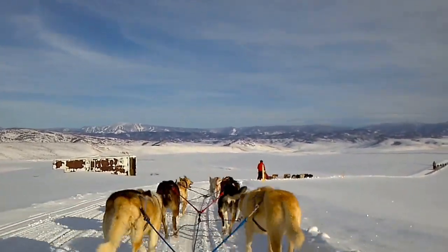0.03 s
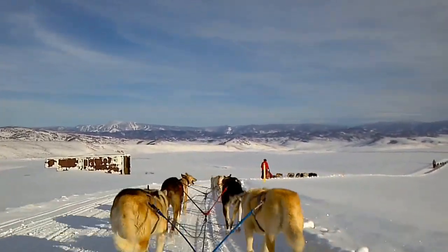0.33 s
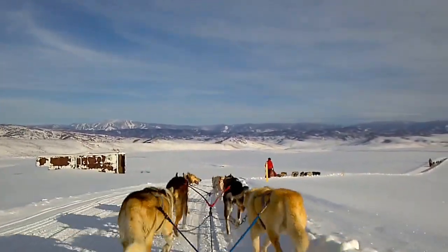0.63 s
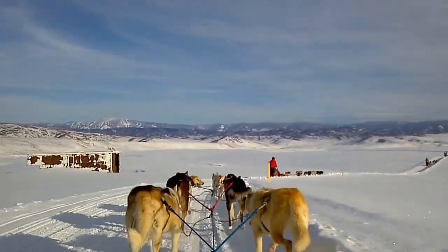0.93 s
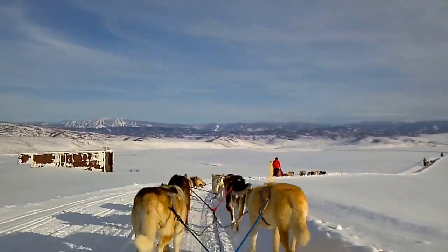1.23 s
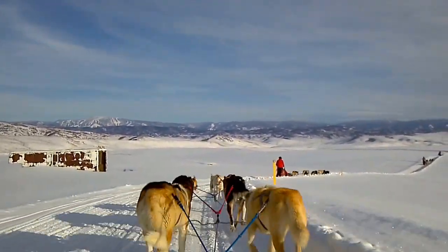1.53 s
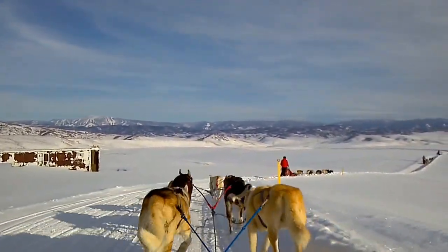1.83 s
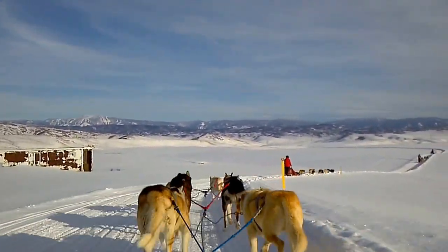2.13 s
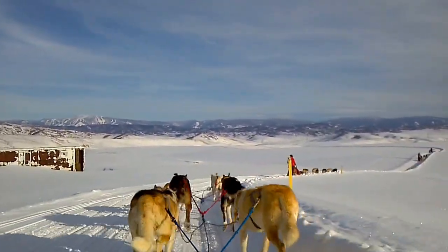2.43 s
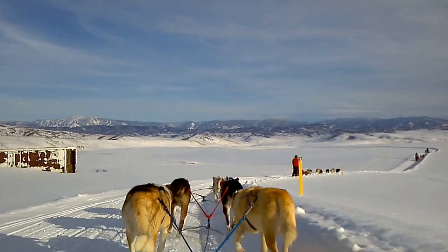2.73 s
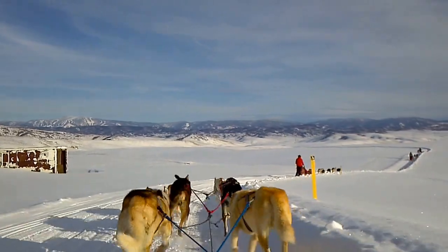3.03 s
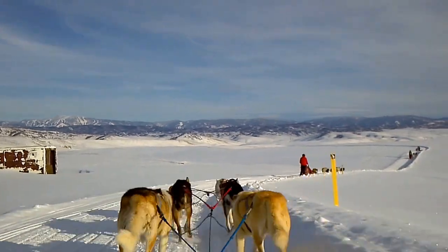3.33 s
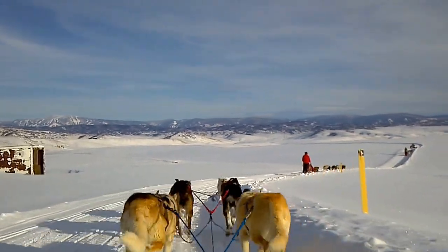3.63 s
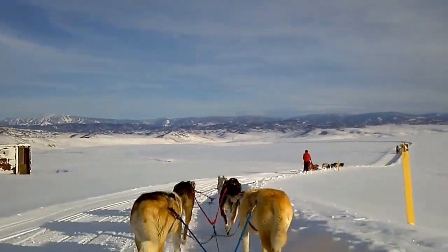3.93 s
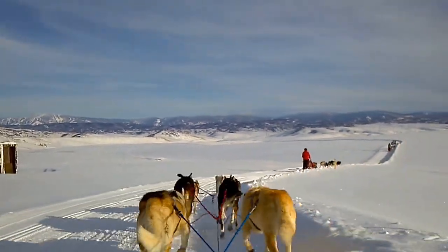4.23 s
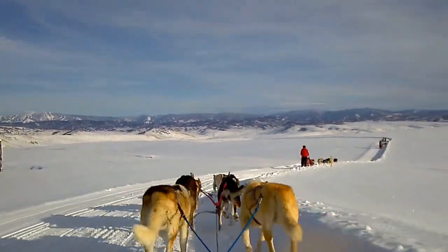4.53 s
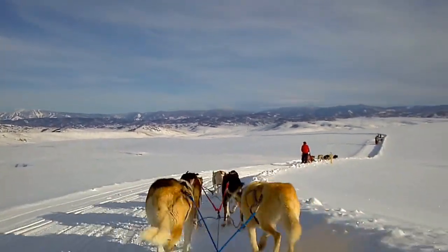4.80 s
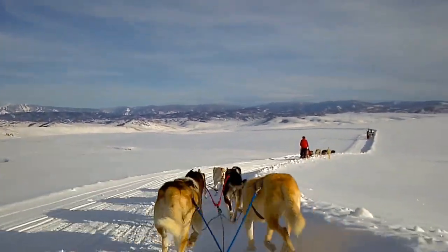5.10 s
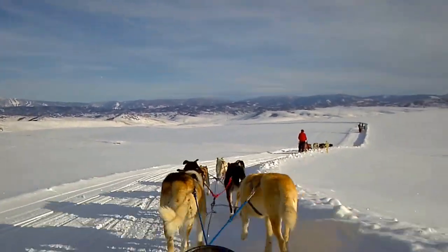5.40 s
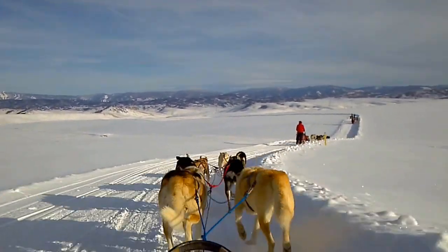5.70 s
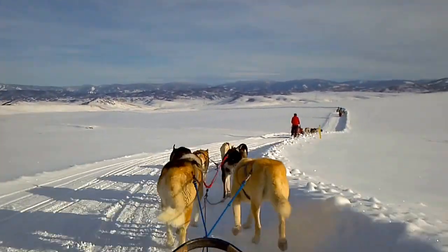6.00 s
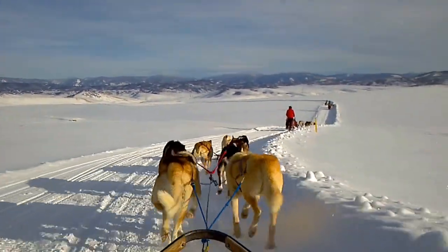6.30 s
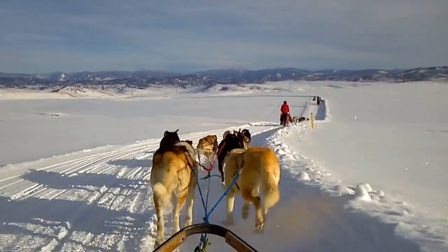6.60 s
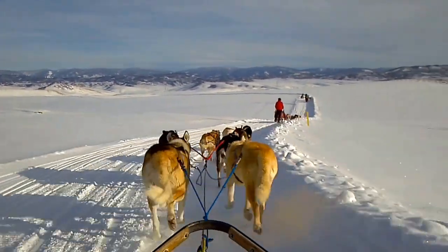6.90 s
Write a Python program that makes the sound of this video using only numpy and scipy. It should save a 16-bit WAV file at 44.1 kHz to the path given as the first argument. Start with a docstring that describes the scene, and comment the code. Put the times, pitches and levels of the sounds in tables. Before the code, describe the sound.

A dog sled slides over packed snow for about seven seconds, heard in wide stereo from a microphone riding on it. The runners make a continuous gritty grind and hiss over the low booming of the frame, with a fine spray of powder toward the left. Headwind rumbles and thumps irregularly on the microphone throughout. Hard lumps knock dully under the runners with short crunches, clustering between 1 and 2 seconds, loudest around 3 seconds, and returning near 4.3 and 6 seconds. Ridges jolt the frame at about 1.7, 2.4, 3.1, 4.2 and 5.2 seconds. Snow crumbs tick dryly against the sled, and steel harness snaps give faint, very high clinks, with small flurries near 1.9 and 3.5 seconds. From about 3.7 seconds the grinding softens slightly while the wind gets stronger and buffets more often, continuing to the end.

```python
"""A gritty grinding and hiss over a booming frame: a dog sled glides on packed snow.
Friction under the runners breaks the crust and sprays powder; lumps knock and ridges shake the frame.
Crumbs of snow tick against the sled and steel harness snaps clink.
Turbulence in the headwind buffets the two microphone ports of a camera riding on the sled,
which spreads their signals into wide stereo."""
import sys
import numpy as np
from scipy.fft import rfft, irfft, next_fast_len
from scipy.io import wavfile
from scipy.ndimage import map_coordinates

SR = 44100
rng = np.random.default_rng(int(sys.argv[2]) if len(sys.argv) > 2 else 0)


def int16_out(signal):
    """Quantize to a 16-bit WAV file."""
    q = np.round(np.clip(np.atleast_2d(signal).T, -1, 1) * 32767)
    wavfile.write(sys.argv[1], SR, q.astype(np.int16))


N = 306495
PORT_GAP_S = 0.000363  # travel time of sound from port to port


def amp(db):
    """Decibels to amplitude ratio."""
    return 10 ** (np.asarray(db) / 20)

def unit(x):
    """Normalisation to rms 1."""
    return x / np.sqrt(np.mean(x ** 2) + 1e-20)

def curve(rows):
    """Linear interpolation of (time_s, value) rows at every sample."""
    return np.interp(np.arange(N) / SR, *np.transpose(rows))

def wobble(knot_hz):
    """Slow random modulation: a spline through Gaussian knots."""
    knots = rng.standard_normal(int(N * knot_hz / SR) + 4)
    return map_coordinates(knots, [np.arange(N) * knot_hz / SR])

def filtered(x, response):
    """Linear filtering: the spectrum times a complex frequency response."""
    n = x.shape[-1]
    padded = next_fast_len(n + 8192)
    return irfft(rfft(x, padded) * response(np.fft.rfftfreq(padded, 1 / SR)), padded)[..., :n]

def coloured(x, spectrum):
    """Spectral shaping by (frequency_hz, level_db) points on a log axis, at rms 1."""
    points_hz, db = np.transpose(spectrum)
    return unit(filtered(x, lambda hz: amp(np.interp(np.log(hz + 1), np.log(points_hz), db))))

def delayed(x, seconds):
    """A pure delay: phase lag proportional to frequency."""
    return filtered(x, lambda hz: np.exp(-2j * np.pi * hz * seconds))

def from_right(x, lag_s=0.00019, shade_db=2):
    """Time and level differences: the left port lags by lag_s and lies shade_db below the right."""
    return np.array([delayed(x, lag_s) * amp(-shade_db / 2), x * amp(shade_db / 2)])

def add(track, start_s, sound):
    """Superposition of a short sound on the track."""
    part = track[..., max(round(start_s * SR), 0):][..., :sound.shape[-1]]
    part += sound[..., :part.shape[-1]]

def scattered(count, level_db, spread_db):
    """Uniformly random events, as (time_s, level_db) rows."""
    return [(u * N / SR, level_db + spread_db * (v - .5)) for u, v in rng.random((count, 2))]

def grains(rate_hz, spread_db):
    """Shot noise: random impulses with log-normal sizes."""
    size = amp(spread_db * np.clip(rng.standard_normal(N), -2.5, 2.5))
    return unit((rng.random(N) < rate_hz / SR) * size * rng.choice([-1, 1], N))

def grit(rate_hz, spread_db, direct_db):
    """Diffuse grains differ at the two ports; direct ones from the right runner reach both."""
    diffuse = np.array([grains(rate_hz, spread_db) for port in range(2)])
    direct = grains(rate_hz, spread_db)
    return diffuse + amp(direct_db) * from_right(direct, PORT_GAP_S, shade_db=0)

def thump(hz, cycles):
    """A heavily damped oscillation whose envelope peaks after the given cycles."""
    age = np.arange(SR // 20) / SR * hz / cycles
    envelope = age ** 2 * np.exp(2 - 2 * age)
    phase = 2 * np.pi * cycles * (age - 1) + rng.normal(0, 0.32)
    return envelope * np.sin(phase) * rng.choice([-1, 1])


# Strength of the headwind: time_s, level_db
HEADWIND = [(0, -24.5), (1.7, -24), (2.5, -21.5), (3.5, -23), (3.9, -18), (4.3, -18), (4.45, -31),
            (4.6, -20), (5.4, -17), (6.6, -22.5), (6.82, -25), (6.95, -20)]
# Spectrum of turbulent pressure: frequency_hz, level_db
WIND_SPECTRUM = [(20, -22), (45, -14), (65, -7.5), (90, -1.5), (120, 7), (170, -2), (250, -4.5),
                 (330, -8.5), (450, -13), (650, -25.5), (1200, -37), (4000, -89)]
# Strongest eddies: peak_s, level_db, pitch_hz
BUFFETS = [(1.024, -10, 135), (1.587, -10, 160), (2.05, -4.5, 159), (2.474, -9, 140), (2.51, -10, 178),
           (3.184, -6, 158), (3.432, -10, 150), (3.865, -7, 126), (3.988, -4.5, 184), (4.236, -4, 155),
           (4.336, -6, 260), (4.614, -9, 135), (4.877, -5.5, 170), (5.042, -15, 139), (5.279, -4, 170),
           (5.369, -10, 145), (5.4, -6, 140), (5.631, -14, 141), (5.945, -5.5, 229), (6.042, -8, 130),
           (6.183, -4, 165), (6.321, -4, 198), (6.402, -6, 125), (6.623, -1.5, 150), (6.7425, -6, 220),
           (6.7475, -8, 268)]

def wind(stride_hz=2.4, tug_at_s=0.19, eddy_hz=160, cycles=0.59, windward_db=4.5):
    """Turbulent pressure swells with each tug of the dogs; each large eddy strikes just one port."""
    tug = np.cos(2 * np.pi * stride_hz * (np.arange(N) / SR - tug_at_s))
    flow_db = curve(HEADWIND) + 1.5 * tug + 0.69 * wobble(7)
    churn_db = 2.3 * np.array([wobble(25), wobble(25)])
    exposure = amp(churn_db + [[-windward_db], [windward_db]])  # the right port is more exposed
    rumble = coloured(rng.standard_normal((2, N)), WIND_SPECTRUM)
    ports = amp(flow_db - 5.5) * unit(exposure * rumble)
    lesser = [(s, flow_db[int(s * SR)] + db, eddy_hz * rng.normal(1, 0.26))
              for s, db in scattered(count=8, level_db=-1, spread_db=1)]
    for s, db, hz in list(BUFFETS) + lesser:
        port = ports[int(rng.random() < .7)]
        add(port, s - cycles / hz, amp(db - 1) * thump(hz, cycles))
        add(port, s, amp(db - 11) * thump(2.1 * hz, cycles))  # a smaller eddy breaks off
    return ports


# Spectrum of tiny contacts, steel or ice: frequency_hz, level_db
BRIGHT_SPECTRUM = [(2000, -36), (6000, -8.5), (8500, -4), (10700, 0), (12200, -2.5), (13000, -6.5),
                   (14000, -4), (14900, -8), (16000, -8)]
# Modes of a steel snap: frequency_hz, level_db, t60_s
SNAP_MODES = [(10170, 1.5, 0.047), (10680, 2.5, 0.04), (13000, 2, 0.029), (14620, -3, .03),
              (15000, -3, .025)]
# Collisions of the snaps: start_s, level_db, pitch_hz
CLINKS = [(0.7882, -23, 15100), (1.209, -35, 14800), (1.3952, -23, 14800), (1.8816, -24, 10700),
          (1.8915, -28, 14700), (1.9121, -21, 11000), (1.9182, -21, 14800), (1.9235, -25, 11500),
          (1.9305, -22, 13000), (1.956, -27, 14800), (2.3976, -26, 13000), (2.411, -27, 13000),
          (2.56, -27, 10600), (2.9594, -30, 10100), (3.5315, -30, 10200), (3.5369, -22, 13000),
          (3.546, -31, 10700), (3.5595, -27, 13000), (3.572, -28, 10200), (3.5932, -27, 10200),
          (4.84, -28, 14800), (5.1736, -23, 13100), (5.233, -28, 14800), (5.551, -32, 14800),
          (6.217, -26, 10300), (6.61, -25, 14800)]

def harness(level_db=-7.5, focus_hz=1100, click_t60_s=0.018, attack_s=0.00044):
    """Modal ringing: colliding snaps click, then ring most in the modes near one pitch."""
    track, t = np.zeros((2, N)), np.arange(SR // 8) / SR
    # the dogs farther ahead add a faint jingle
    jingle = [(s, db, SNAP_MODES[rng.integers(len(SNAP_MODES))][0])
              for s, db in scattered(count=40, level_db=-33, spread_db=8)]
    for s, db, pitch_hz in list(CLINKS) + jingle:
        clink = amp(-60 * t / click_t60_s) * coloured(rng.standard_normal((2, len(t))), BRIGHT_SPECTRUM)
        for hz, mode_db, t60_s in SNAP_MODES:
            weight = amp(mode_db + rng.normal(0, 1.5, (2, 1))) / np.hypot(1, (hz - pitch_hz) / focus_hz)
            chatter = 0.085 * np.cumsum(rng.standard_normal(len(t)))  # phase noise roughens the ring
            phase = 2 * np.pi * (hz * rng.normal(1, 0.0054) * t + rng.random((2, 1)))
            clink += weight * amp(-60 * t / t60_s) * np.sin(phase + chatter)
        add(track, s, amp(db + level_db) * (1 - np.exp(-t / attack_s)) * clink)
    return track * amp([[2.0], [-2.5]])


# Larger crumbs of snow hitting the sled: start_s, level_db, pitch_hz
CRUMBS = [(0.0213, -26, 9000), (0.0366, -20, 9800), (0.4262, -18, 9100), (0.4833, -22, 10100),
          (0.5303, -16, 8800), (0.5365, -23, 8000), (0.8173, -27, 10000), (0.8857, -21, 10500),
          (1.0937, -21.5, 9600), (1.4173, -19.5, 9900), (1.5722, -25, 11500), (2.0062, -25, 9000),
          (2.0341, -30, 7400), (2.465, -20, 9000), (2.5772, -25, 9900), (3.3048, -26, 9700),
          (3.3185, -21, 9000), (3.6252, -29, 10400), (3.6315, -21.5, 10400), (3.6628, -19, 9800),
          (3.775, -17, 12500), (3.9303, -24, 6500), (4.0423, -29, 7300), (4.1, -31, 10000),
          (4.6383, -20, 6000), (4.744, -19, 5500), (4.8037, -23, 9800), (5.2073, -24, 7100),
          (5.6151, -19.5, 10300), (6.0455, -19.5, 10900), (6.0687, -23, 9600), (6.6674, -25, 9900),
          (6.8313, -26, 7000), (6.8805, -27, 9500)]

def crumbs(level_db=-0.5, width_hz=8500, t60_s=0.011, attack_s=0.00037):
    """Impact noise: each crumb bursts in a dry, bright tick of band-passed noise."""
    track, t = np.zeros((2, N)), np.arange(SR // 15) / SR
    envelope = amp(-60 * t / t60_s) * (1 - np.exp(-t / attack_s))
    small = [(s, db, 9800 * rng.normal(1, 0.13))
             for s, db in scattered(count=20, level_db=-42, spread_db=15)]
    for s, db, pitch_hz in list(CRUMBS) + small:
        band = lambda hz: 1j * hz * width_hz / (pitch_hz ** 2 - hz ** 2 + 1j * hz * width_hz)
        diffuse = rng.standard_normal((2, len(t)))
        direct = amp(-1) * from_right(rng.standard_normal(len(t)), PORT_GAP_S, shade_db=-3)
        add(track, s, amp(db + level_db) * envelope * unit(filtered(diffuse + direct, band)))
    return track


# How hard the runners rub the snow: time_s, level_db
FRICTION = [(0.0, -43.5), (0.17, -43.5), (0.95, -43.5), (1.16, -40.5), (1.57, -44.5), (1.97, -43),
            (2.26, -45), (2.38, -42), (2.67, -41.5), (3.39, -44), (4.06, -42.5), (4.12, -44), (5.19, -41.5),
            (5.48, -43.5), (5.88, -41), (6.81, -48.5), (6.83, -42), (6.95, -49.5)]

def crackle(level_db=-52.5):
    """Brittle fracture: single ice crystals snap in sparse ticks, louder as friction rises."""
    friction_db = curve(FRICTION)
    ticks = coloured(grit(rate_hz=70, spread_db=1.5, direct_db=2), BRIGHT_SPECTRUM)
    return amp(level_db + 0.69 * (friction_db - friction_db.mean())) * ticks

def spray(friction_db, level_db=-46):
    """Particle noise: harder rubbing throws up more powder, in puffs, mostly on the left."""
    powder = coloured(grit(rate_hz=7000, spread_db=6, direct_db=-2.5), BRIGHT_SPECTRUM)
    puffs_db = 1.8 * wobble(10) + 2.56 * wobble(45)
    envelope = amp(level_db + 0.55 * (friction_db - friction_db.mean()) + puffs_db)
    return envelope * powder * amp([[3.3], [-6.5]])


# Spectrum of coarse snow grains: frequency_hz, level_db
COARSE_SPECTRUM = [(300, -8), (700, 3), (1000, 2.5), (1250, 2.5), (1600, 0.5), (2000, -2.5), (2400, -3),
                   (3200, -5), (4200, -17.5), (8000, -43)]
# Slabs of crust crumbling under a runner: time_s, level_db, rise_s
CRUNCHES = [(0.207, -34, .005), (0.873, -30, .003), (1.01, -34, .005), (1.084, -34, .005),
            (1.145, -32, .005), (1.207, -32, .003), (1.231, -26, 0.0048), (1.69, -32, 0.0046),
            (1.954, -30, .003), (2.576, -36, .005), (2.872, -33, 0.0045), (3.019, -30, 0.0037),
            (3.203, -35, .004), (3.968, -26.5, .003), (4.585, -40, .003), (4.7445, -29, .0012),
            (4.837, -32, .003), (5.132, -26, .005), (5.712, -26, .004), (5.85, -30, .005),
            (5.897, -31, 0.0046), (5.93, -32, 0.0042), (6.12, -28, .005)]

def crunches(level_db=-3):
    """Cascading fracture: a slab gives way in a quick rush of coarse grains."""
    envelope, t = np.zeros(N), np.arange(SR // 10) / SR
    for s, db, rise_s in CRUNCHES:
        add(envelope, s - rise_s / 2, amp(db + level_db) * t / rise_s * np.exp(1 - t / rise_s))
    return envelope * coloured(grit(rate_hz=1300, spread_db=5, direct_db=2.5), COARSE_SPECTRUM)


# Large ridges in the trail: peak_s, level_db
JOLTS = [(0.326, -21), (1.213, -18), (1.691, -10.5), (2.418, -14), (3.105, -13), (4.176, -14.5),
         (4.211, -20), (5.198, -15), (5.218, -14), (5.295, -17), (5.595, -15), (6.05, -19)]

def jolts(frame_hz=250, cycles=1.8):
    """Damped resonance: a large ridge sets the frame booming for a few cycles."""
    track = np.zeros(N)
    for s, db in JOLTS:
        add(track, s - cycles / frame_hz, amp(db) * thump(frame_hz * rng.normal(1, 0.12), cycles))
    return from_right(track, shade_db=-4)[::-1]  # earlier on the left, louder on the right


# Hardness of the trail, from crust to softer snow: time_s, level_db
CRUST = [(0, -29.5), (0.3, -27.5), (0.6, -29.5), (1.2, -28), (1.5, -28), (1.8, -26.5), (2.05, -28.5),
         (2.5, -27), (3.15, -28.5), (3.7, -33), (4.5, -34), (5.15, -31.5), (5.45, -34.5), (5.95, -32),
         (6.75, -36), (6.95, -35.5)]
# Hard lumps under the runners: start_s, level_db, relative_crack_db, pitch_hz
KNOCKS = [(.1995, -12, -22, 430), (.217, -14, -11, 520), (.312, -11, -34, 397), (.637, -13, -28, 400),
          (.997, -15, -17, 520), (1.011, -11, -16, 517), (1.0255, -10.5, -12, 560), (1.1635, -11, -24, 540),
          (1.2035, -8.5, -18, 417), (1.229, -14.5, -8, 480), (1.236, -12, -17, 418),
          (1.3885, -12.5, -14, 507), (1.691, -17.5, -3, 400), (1.774, -10, -18, 457),
          (1.7852, -15, -22, 450), (1.814, -18, -14, 520), (2.047, -13, -25, 420), (2.259, -12.5, -12, 480),
          (2.578, -24, -4, 600), (2.8502, -13, -7, 596), (2.8527, -3.5, -17, 455), (2.8774, -10, -19, 470),
          (3.0545, -10, -17, 420), (3.1226, -5, -14, 523), (3.4905, -15, -15, 460), (4.3343, -6, -30, 380),
          (4.398, -18, -22, 520), (4.7293, -16, -26, 420), (5.137, -17, -14, 480), (5.2148, -20, -20, 400),
          (5.851, -14.5, -8, 480), (5.9318, -12.5, -8.5, 500), (5.937, -21, -17, 520),
          (5.979, -16.5, -11, 540), (6.3203, -13, -28, 380), (6.397, -16.5, -12, 462),
          (6.615, -12.5, -28, 317), (6.741, -11.5, -30, 320), (6.7455, -10.5, -30, 330)]

def knocks(level_db=-2.56, cycles=0.57, crack_hz=1250, splinter_t60_s=0.0081):
    """Impulsive excitation: lumps knock dully on the runners as the crust cracks and splinters."""
    track, splinter_envelope = np.zeros(N), np.zeros(N)
    crust_db, t = curve(CRUST), np.arange(SR // 30) / SR
    small = [(s, crust_db[int(s * SR)] + db, -13, 460)
             for s, db in scattered(count=8, level_db=5.5, spread_db=7)]
    for s, db, crack_db, hz in list(KNOCKS) + small:
        add(track, s, amp(db + level_db) * thump(hz * rng.normal(1, 0.044), cycles))
        add(track, s, amp(db + crack_db + 1) * thump(crack_hz * rng.normal(1, 0.082), cycles))
        add(splinter_envelope, s, amp(db + crack_db - 4 - 60 * t / splinter_t60_s))
    return from_right(track + splinter_envelope * coloured(rng.standard_normal(N), COARSE_SPECTRUM))


# Unevenness of the trail: time_s, level_db
RIDGES = [(0, -30.5), (0.15, -26.5), (0.55, -30.5), (1.2, -27), (1.6, -29.0), (2.25, -31), (2.45, -27.5),
          (2.9, -29), (3.1, -26.5), (3.6, -30.5), (4.25, -30.5), (4.45, -32), (4.7, -31.5), (5.25, -30),
          (6.1, -28), (6.6, -31), (6.8, -41), (6.95, -30.5)]
# Response of the sled frame: frequency_hz, level_db
FRAME_SPECTRUM = [(20, -34), (45, -9), (65, -12), (90, 2), (125, 2), (190, -1), (260, 1), (315, -11),
                  (450, -14.5), (900, -52), (2000, -80)]

def frame_boom(load, level_db=7.5):
    """Forced vibration: ridges shake the frame, heard earlier on the left and louder on the right."""
    vibration = coloured(grains(rate_hz=1100, spread_db=2), FRAME_SPECTRUM)
    boom = amp(curve(RIDGES) + level_db + 1.34 * load) * vibration
    return from_right(boom, lag_s=0.00015, shade_db=-2.2)[::-1]


# Spectrum of fine crystals rubbing: frequency_hz, level_db
HISS_SPECTRUM = [(700, -9.5), (1400, -3.5), (2200, -2), (2800, -8.5), (3600, -0.5), (4200, -1.5),
                 (5100, -3), (6500, -5), (9000, -7.5), (16000, -16)]
# Spectrum of crust being ground: frequency_hz, level_db
GRIND_SPECTRUM = [(120, -45), (250, -5), (350, 3), (450, 0), (560, -4), (700, -7), (830, -15),
                  (1200, -20.5), (2000, -51), (5000, -79)]

def runners():
    """Sliding friction: crust grinds, coarse grains scrape and crystals hiss, with boom and spray."""
    friction_db, crust_db = curve(FRICTION), curve(CRUST)
    hardness_db = crust_db - crust_db.mean()
    load = wobble(36)  # the sled's weight shifts from ridge to ridge
    boom = frame_boom(load)
    grind_db = crust_db - 0.97 + 0.21 * hardness_db + 0.99 * wobble(12) + 1.45 * load
    crushed = coloured(grains(rate_hz=1200, spread_db=2), GRIND_SPECTRUM)
    grind = from_right(amp(grind_db) * crushed, lag_s=0.00015, shade_db=2.9)
    coarse = coloured(grit(rate_hz=2500, spread_db=4, direct_db=-0.2), COARSE_SPECTRUM)
    scrape_db = friction_db + 4 + 0.057 * hardness_db + 1.62 * wobble(50)
    scrape = amp(scrape_db) * coarse * amp([[-1.5], [1.5]])  # mostly under the right runner
    crystals = coloured(grit(rate_hz=7000, spread_db=3, direct_db=-4), HISS_SPECTRUM)
    hiss = amp(friction_db + 3 + 1.14 * load + 0.79 * wobble(60)) * crystals
    return boom + grind + scrape + hiss + spray(friction_db)


def scene():
    """Superposition of all sources at the two microphone ports."""
    return runners() + knocks() + jolts() + crunches() + crackle() + crumbs() + harness() + wind()

def record(dry, crossfeed=0.98, lean_db=1.7, lean_hz=450, low_cut_hz=46, top_hz=15800):
    """Delay-and-subtract crossfeed widens the stereo; the bass leans right and the band is limited."""
    wide = dry - crossfeed * delayed(dry[::-1], PORT_GAP_S)
    lean = lambda hz: amp(np.outer([-1, 1], lean_db / (1 + (hz / lean_hz) ** 2)))
    low_cut = lambda hz: hz ** 2 / np.hypot(hz ** 2, low_cut_hz ** 2)
    return filtered(wide, lambda hz: lean(hz) * low_cut(hz) * (hz < top_hz))


dry = scene()
out = record(dry)
int16_out(out)
```